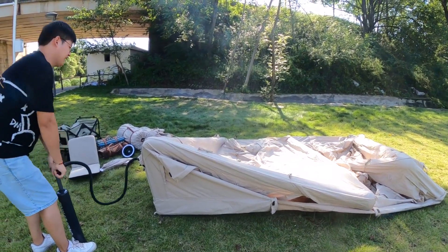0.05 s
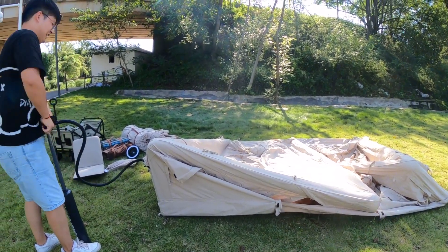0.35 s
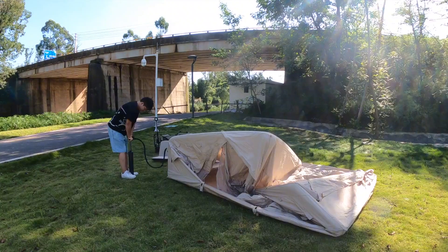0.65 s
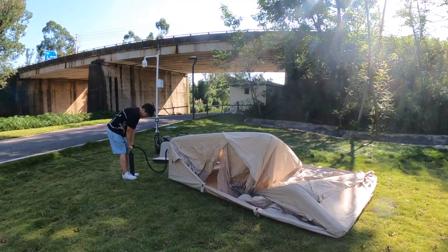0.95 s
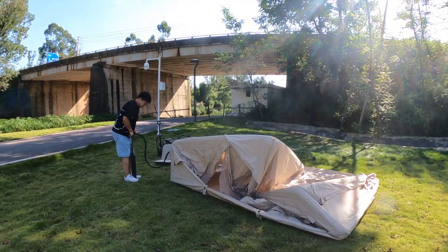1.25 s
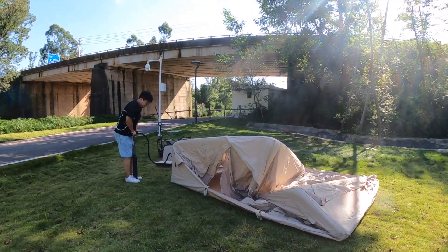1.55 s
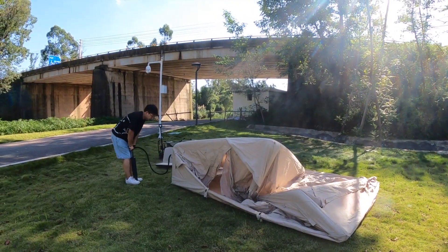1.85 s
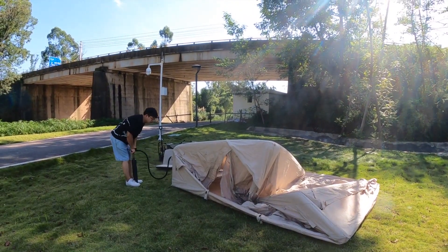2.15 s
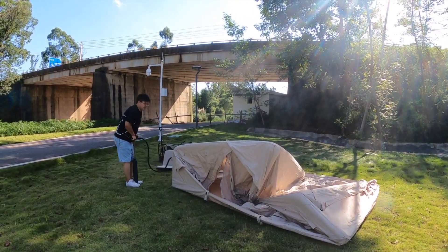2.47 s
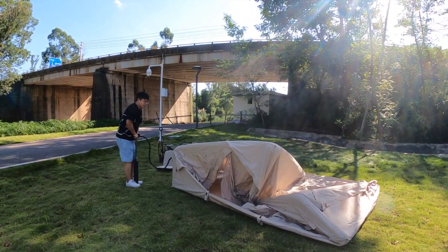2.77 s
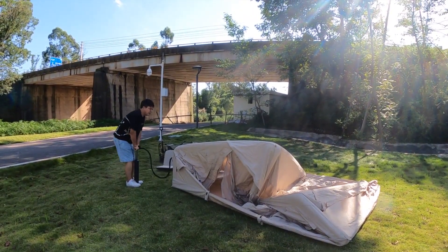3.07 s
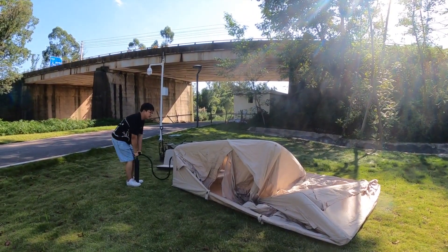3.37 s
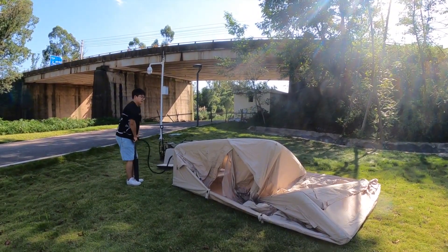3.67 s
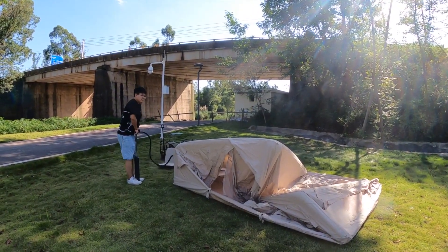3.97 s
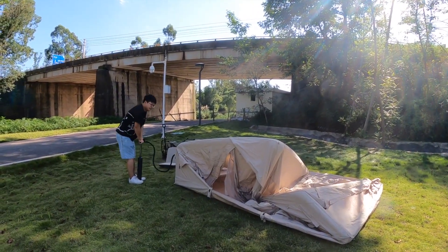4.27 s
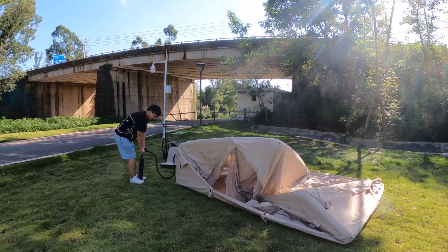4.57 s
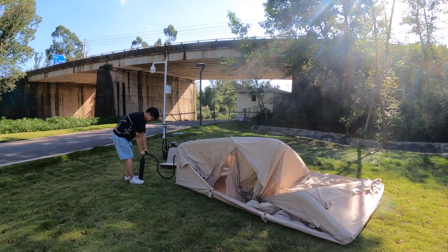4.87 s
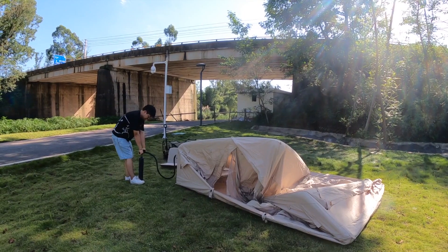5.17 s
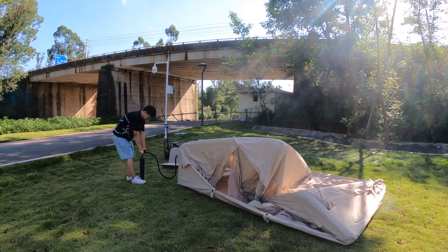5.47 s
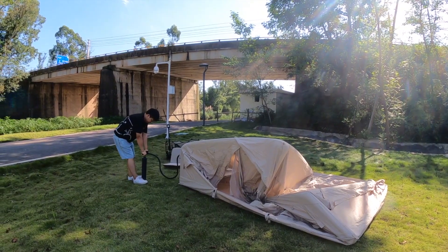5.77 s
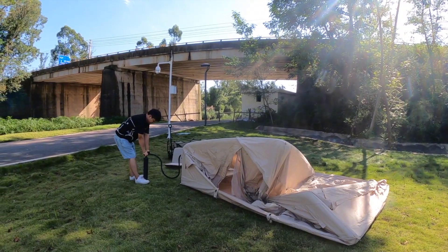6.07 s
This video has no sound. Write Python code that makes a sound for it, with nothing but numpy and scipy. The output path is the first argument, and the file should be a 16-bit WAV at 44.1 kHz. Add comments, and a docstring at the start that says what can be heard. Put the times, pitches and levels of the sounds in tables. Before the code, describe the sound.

A hand air pump inflates a tent outdoors. It begins close and slightly left, with a short rush of air, then a hollow valve thump and a loud, bright hiss at 0.2 seconds. Everything cuts to silence at about 0.7 seconds and fades back in at 0.9, with the pump now farther off and centred. Strokes follow roughly every 0.6 seconds, each a breathy hiss with a gently sweeping tone. Firmer thumps fall at about 1.2, 2.3 and 3.6 seconds, with softer ones between them. The last stroke starts at 4.2 seconds and dies away by 5. Underneath runs a low rumble of engines and tyres from a road bridge, with a faint, steady sizzle of insects. The engine drone swells from about 4 seconds. A distant bird chirps faintly between 4.9 and 6 seconds, and a tiny puff of air escapes the pump near 5.9.

```python
"""A double-action hand pump fills a tent: its valve thumps at each turn of the handle and air hisses through.
The hiss also bounces off the lawn, so its colour sweeps as the handle rises and sinks.
Behind it sits a bed of engine drone and tyre wash from a road bridge, sizzling insects and a far bird.
The pump starts close on the left; after a brief drop to silence it plays on from farther off."""
import sys
import numpy as np
from scipy import signal
from scipy.fft import rfft, irfft, next_fast_len
from scipy.io import wavfile
from scipy.ndimage import uniform_filter1d, map_coordinates

SR = 44100
rng = np.random.default_rng(int(sys.argv[2]) if len(sys.argv) > 2 else 0)


def output_pcm(signal):
    """Save a mono or channel-first signal as 16-bit PCM at the path in sys.argv[1].

    Samples are clipped to [-1, 1] before scaling.
    """
    pcm = np.clip(np.atleast_2d(signal).T, -1, 1) * 32767
    wavfile.write(sys.argv[1], SR, np.round(pcm).astype(np.int16))


N = 278897
T = np.arange(N) / SR

# calls of the far bird: start_s, level_db
CHIRPS = [(4.88, -65), (5.1, -66.5), (5.26, -62.5), (5.42, -66.5), (5.61, -71), (5.78, -70)]
# tone colours of the road bed: frequency_hz, relative_db
RUMBLE_SPECTRUM = [(10, 0), (28, 5), (55, 9.5), (80, 1.5), (105, 1), (160, -0.5), (220, -10.5), (300, -4),
                   (450, -8.5), (700, -18), (2000, -82)]
TYRE_SPECTRUM = [(150, -40.5), (400, -3), (560, 1), (720, 3), (1020, 9.5), (1500, 3.5), (2100, -3.5),
                 (3000, -12.5), (4500, -14.5), (6000, -18), (8000, -24), (10000, -33.5), (15000, -57)]
TYRE_SIDE_SPECTRUM = [(100, -31), (180, -10), (300, 4.5), (550, 6.5), (780, 6), (1100, 4.5), (1600, 0.5),
                      (2200, -0.5), (3000, -2), (4300, -9.5), (6000, -11.5), (8000, -11.5), (12000, -26.5),
                      (15000, -46)]  # the part that differs between the ears
# fader ride of the tyre wash: time_s, level_db
TYRE_LEVELS = [(0.67, -36), (0.9, -47), (1.7, -50), (3.6, -53.5), (4.2, -51.5), (4.9, -50.5), (5.4, -51),
               (6.32, -48)]
# engines before and after the silence: time_s, firing_hz, first_harmonic_db, second_harmonic_db
NEAR_ENGINE = [(0, 81.9, -35, -30.5), (0.17, 83.9, -39, -34), (0.28, 82.8, -36.5, -47)]
FAR_ENGINE = [(0.9, 74.1, -54.5, -58.5), (1.8, 71.96, -52.5, -67), (2.1, 71.59, -39.5, -56),
              (2.3, 70.5, -53.5, -52), (3.9, 70.81, -46, -60.5), (4.65, 71.34, -40, -43.5),
              (5.1, 70.03, -37.5, -43.5), (5.45, 71.05, -34.5, -43), (5.85, 71.35, -39, -47),
              (6.32, 67.3, -48, -71)]
# upper harmonics of the exhaust: harmonic_number, relative_db
EXHAUST_HARMONICS = [(3, -7.5), (4, -10.5), (5, -15), (6, -21.5), (8, -25)]
# drone under the bridge: time_s, boom_db, growl_db
BRIDGE_DRONE = [(0, -54, -60.5), (3.4, -54.5, -54.5), (3.9, -46, -53.5), (4.5, -49.5, -46),
                (5.1, -43, -57.5), (5.8, -44.5, -47.5), (6.32, -42.5, -48)]
# EQ of the pump's scattered sound, close by and farther off: frequency_hz, relative_db
NEAR_SCATTER_EQ = [(50, -46.5), (120, -30), (250, -35), (600, -34.5), (1200, -45.5), (1800, -44.5),
                   (2600, -45.5), (3400, -46.5), (5000, -45.5), (7500, -36.5), (12000, -5), (15000, -23)]
FAR_SCATTER_EQ = [(200, -45), (1000, -34), (3000, -33.5), (12000, -15)]
# turning points of the handle: time_s, height_fraction (0 bottom, 1 top)
HANDLE_TURNS = [(0, 0.1), (0.16, 0), (0.54, 1), (1.11, 0), (1.63, 1), (2.2, 0), (2.85, 1), (3.47, 0.08),
                (4.15, 1), (4.76, 0.07)]
# the rod shifting in its guide: start_s, level_db
SCUFFS = [(0.183, -36.5), (1.159, -45), (1.715, -47), (2.307, -46), (4.16, -53)]
# flips of the valve flap: start_s, thump_db, pitch_ratio, tick_lift_db
VALVE_FLIPS = [(0.2138, -21.5, 1.64, 3), (1.181, -19.5, 1.03, -0.5), (1.738, -36, 1.0, 5),
               (2.3474, -26, 0.975, 7.5), (2.94, -36.5, 0.89, 2), (3.6112, -24, 1.03, -8),
               (4.243, -36, 0.96, 3)]
# barrel modes, before each flip retunes them: pitch_hz, relative_db, swell_s
BARREL_MODES = [(251, 3, 0.0027), (770, -5.5, 0.0036), (970, -6, 0.0017), (3850, -14, 0.0055)]
# air resonances of the hollow shaft: centre_hz, width_hz, peak_db
SHAFT_RESONANCES = [(1550, 45, -2.5), (2645, 38, 2.5), (2845, 19, -12), (3040, 23, -19), (3400, 40, -3.5),
                    (3600, 80, 0.5), (3784, 49, -1), (4264, 120, -7), (5300, 58, -12), (5560, 100, -6),
                    (5880, 53, -11.5), (6080, 35, -2.5), (6840, 110, -10)]
# colours of the rushing air, from hollow to thin: frequency_hz, relative_db
CHUFF_SPECTRUM = [(100, -33.5), (300, -6.5), (600, -3.5), (900, 2.5), (1300, 2.5), (1750, 1), (2100, 1),
                  (2500, -3), (3500, -29.5), (8000, -64)]
HISS_SPECTRUM = [(900, -47), (1900, -3), (2350, 0.5), (2650, 0), (3000, 2), (3500, -2.5), (3900, -4),
                 (4400, -8.5), (5200, -16.5), (9000, -54)]
FIZZ_SPECTRUM = [(2500, -29.5), (4100, -6), (4600, 1), (5100, -0.5), (5900, 1), (6900, -3.5), (7700, -10),
                 (9000, -15.5), (10300, -22.5), (11300, -29), (12500, -27.5), (15000, -52.5)]
SLIT_SPECTRUM = [(4000, -42.5), (6500, 2), (7500, 2), (8400, 9), (10200, 8), (11300, 0.5), (12500, 4),
                 (15000, -19.5)]
# piston strokes, rising to the hardest push and falling to the stop:
# start_s, rise_s, fall_s, sag_db_per_s, hiss_db, chuff_db, fizz_db, slit_vs_fizz_db, hum_vs_hiss_db
UPSTROKES = [ (0.214, 0.14, 0.29, 55, -25.5, -38.5, -28.5, -15, -39.5),
             (1.183, 0.155, 0.34, 51.5, -32.5, -43.5, -44, -21, -11.5),
             (2.347, 0.1, 0.435, 24.5, -39, -46.5, -50, -12, -23),
             (3.613, 0.21, 0.32, 41.5, -36, -44, -46, -14.5, -22)]
DOWNSTROKES = [ (-0.02, 0.05, 0.12, 60.6, -28.5, -34.5, -31, -13, -26),
               (0.8, 0.14, 0.19, 48, -32.5, -44, -45, -39, -29),
               (1.738, 0.27, 0.24, 47.4, -39, -47.5, -48.5, -17.5, -13),
               (2.94, 0.41, 0.21, 52, -38, -48, -46.5, -16.5, -17.5),
               (4.243, 0.21, 0.48, 18, -41.5, -47, -46.5, -14.5, -24)]
# stereo width of the mix: time_s, side_gain_db
STEREO_WIDTH = [(0.68, -2.8), (0.88, -28), (3.1, -23), (3.7, -4)]

CUT_S, RESUME_S = 0.672, 0.897  # the silence between the close and the far perspective
CLOSE = T < CUT_S


def amp(db):
    """Decibels to gain."""
    return 10 ** (np.asarray(db) / 20)


def unit(x):
    """Scale to rms 1."""
    return x / np.sqrt(np.mean(x ** 2) + 1e-20)


def curves(rows):
    """One automation curve for each column after the time."""
    times, *columns = np.transpose(rows)
    return [np.interp(T, times, column) for column in columns]


def wobble(rate_hz):
    """A smooth random drift through rate_hz points a second."""
    coarse = T[::32]
    knots = rng.standard_normal(int(N * rate_hz / SR) + 4)
    return np.interp(T, coarse, map_coordinates(knots, [coarse * rate_hz]))


def filtered(x, response):
    """Filter x by a gain that is a function of frequency."""
    size = next_fast_len(N + 8192)
    return irfft(rfft(x, size) * response(np.fft.rfftfreq(size, 1 / SR)), size)[..., :N]


def equalised(x, points):
    """Shape x with an EQ curve through (frequency_hz, gain_db) points."""
    points_hz, db = np.transpose(points)
    return filtered(x, lambda hz: amp(np.interp(np.log(hz + 1), np.log(points_hz), db)))


def rush(spectrum):
    """Coloured noise of rms 1."""
    return unit(equalised(rng.standard_normal(N), spectrum))


def band(centre_hz, width_hz):
    """A band of noise of rms 1."""
    return unit(filtered(rng.standard_normal(N), lambda hz: 1 / (1 + ((hz - centre_hz) / width_hz) ** 4)))


def whistle(centre_hz, width_hz):
    """A breathy tone of rms 1 that follows a pitch curve."""
    a, b = filtered(rng.standard_normal((2, N)), lambda hz: 1 / (1 + (hz / width_hz) ** 2))
    phase = 2 * np.pi * np.cumsum(centre_hz) / SR
    return unit(a * np.cos(phase) + b * np.sin(phase))


def spread(mid, side):
    """Mid and side to left and right."""
    return np.array([mid + side, mid - side])


def background_hiss(level_db=-95):
    """A very faint, steady high background hiss."""
    return amp(level_db) * spread(band(12300, 500), band(12300, 500))


def insects(level_db=-69.5, side_db=-8):
    """Insects sizzle steadily near 7 kHz."""
    return amp(level_db) * spread(band(6850, 390), amp(side_db) * band(6930, 330))


def bird(chirp_s=0.17, first_hz=4080, sweep_hz=196, step_hz=62, side_db=-6):
    """A far bird gives blurred, rising chirps, each a step higher than the last."""
    level, pitch_hz = np.zeros(N), np.full(N, first_hz, float)
    for k, (start, db) in enumerate(CHIRPS):
        progress = np.clip((T - start) / chirp_s, 0, 1)
        level += amp(db) * np.sqrt(4 * progress * (1 - progress))
        pitch_hz = np.where(T >= start, first_hz + step_hz * k + sweep_hz * progress, pitch_hz)
    return level * spread(whistle(pitch_hz, width_hz=290), amp(side_db) * whistle(pitch_hz, width_hz=190))


def engine(rows, upper_db, waver_hz=0.5, waver_db=2.5):
    """A distant exhaust drones on unsteady harmonics of the firing rate."""
    firing_hz, first_db, second_db = curves(rows)
    phase = 2 * np.pi * np.cumsum(firing_hz + waver_hz * wobble(12)) / SR
    harmonics = [(1, first_db), (2, second_db)] + [(k, upper_db + db) for k, db in EXHAUST_HARMONICS]
    drone = np.zeros(N)
    for k, db in harmonics:
        drone += amp(db + waver_db * wobble(10)) * np.sin(k * phase + rng.uniform(0, 2 * np.pi))
    return np.sqrt(2) * drone


def bridge_drone():
    """A low boom and a growl above it hang under the bridge."""
    boom_db, growl_db = curves(BRIDGE_DRONE)
    growl = amp(growl_db) * unit(band(357, 55) + amp(-4) * band(539.7, 66))
    return amp(boom_db) * band(207.8, 39) + growl


def road_rumble(near_db=-33.5, far_db=-45, side_db=-38):
    """The low end of the road heaves gently, almost mono."""
    level = amp(np.where(CLOSE, near_db, far_db) + 2.3 * wobble(7.8))
    return level * spread(rush(RUMBLE_SPECTRUM), amp(side_db) * rush(RUMBLE_SPECTRUM))


def tyres(near_side_db=-5, far_side_db=-12):
    """Tyres on the road make a wide, slowly drifting wash."""
    level_db, = curves(TYRE_LEVELS)
    width = amp(np.where(CLOSE, near_side_db, far_side_db))
    return amp(level_db + 1.1 * wobble(3.7)) * spread(rush(TYRE_SPECTRUM), width * rush(TYRE_SIDE_SPECTRUM))


def road():
    """The traffic bed: engines, drone and rumble in the centre, tyres spread wider."""
    engines = np.where(CLOSE, engine(NEAR_ENGINE, upper_db=-35.5), engine(FAR_ENGINE, upper_db=-54))
    return engines + bridge_drone() + road_rumble() + tyres()


def bridge_echo(x, t60_s=0.97, build_s=0.26):
    """The concrete of the bridge gives back a late wash."""
    t = np.arange(SR // 2) / SR
    tail = rng.standard_normal(len(t)) * amp(-60 * t / t60_s) * np.clip(t / build_s, 0, 1)
    return signal.fftconvolve(x, tail / np.linalg.norm(tail))[:N]


def scattered(x, eq, t60_s=0.12):
    """Tent, hedge and bridge scatter the sound into a short, bright tail."""
    t = np.arange(SR // 5) / SR
    tail = rng.standard_normal(len(t)) * amp(-60 * t / t60_s)
    wet = signal.fftconvolve(x, tail / np.linalg.norm(tail))[:N]
    return equalised(wet, eq)


def handle_motion(turn_s=0.11):
    """Even travel with rounded turns: the height (0 to 1), and a gate that is 1 on the way up."""
    travel, = curves(HANDLE_TURNS)
    rising = uniform_filter1d((np.gradient(travel) > 0) * 1., SR // 20)
    return uniform_filter1d(travel, int(turn_s * SR)), rising


def ground_bounce(x, near_db=-3, low_cut_hz=1300, grass_hz=7500, up_share=0.7, down_share=0.52):
    """The lawn adds a delayed, duller copy: a comb filter that slides with the handle's height."""
    height, rising = handle_motion()
    near_lag_ms = np.interp(height, [0, 1], [1.97, 3.17])
    far_lag_ms = np.interp(height, [0, 1], [0.93, 1.68])
    lag_s = np.where(CLOSE, near_lag_ms, far_lag_ms) / 1000
    share = np.interp(rising, [0, 1], [down_share, up_share]) * amp(np.where(CLOSE, near_db, 0))
    bounce = filtered(x, lambda hz: hz / np.hypot(hz, low_cut_hz) / (1 + (hz / grass_hz) ** 4))
    delayed = map_coordinates(bounce, [(T - lag_s) * SR])
    return (x + share * delayed) / np.sqrt(1 + share ** 2 / 2)


def rod_scuffs(rise_s=0.0051):
    """The rod shifts in its guide as the handle turns: short, dull rubs."""
    level = np.zeros(N)
    for start, db in SCUFFS:
        swell = np.clip(T - start, 0, None) / rise_s
        level += amp(db) * swell * np.exp(1 - swell)
    return level * band(1100, 600)


def leak(start_s=5.925, level_db=-59, fade_db_per_s=75, attack_s=0.012):
    """A soft puff escapes from the resting pump."""
    age = np.clip(T - start_s, 0, None)
    envelope = np.clip(age / attack_s, 0, 1) * amp(level_db - fade_db_per_s * age)
    return envelope * unit(rush(HISS_SPECTRUM) + rush(FIZZ_SPECTRUM))


def valve_thumps():
    """Each flip of the flap puffs into the barrel, whose modes swell and die fast; the top one ticks."""
    thumps, t = np.zeros(N), np.arange(SR // 10) / SR
    for start, thump_db, ratio, tick_db in VALVE_FLIPS:
        for mode in BARREL_MODES:
            hz, mode_db, swell_s = mode
            swell = t * ratio / swell_s
            envelope = (swell * np.exp(1 - swell)) ** 2
            gain = amp(thump_db + mode_db + (tick_db if mode is BARREL_MODES[-1] else 0))
            thumps[round(start * SR):][:len(t)] += gain * envelope * np.sin(2 * np.pi * hz * ratio * t)
    return thumps


def through_shaft(x):
    """The hollow shaft lifts narrow bands of whatever passes through it."""
    return filtered(x, lambda hz: 1 + sum(
        amp(db) / (1 + 2j * (hz - centre) / width) for centre, width, db in SHAFT_RESONANCES))


def eddies(x, frame=1024):
    """Turbulence at the flap favours narrow bands that come and go within a tenth of a second."""
    spectra = signal.stft(x, nperseg=frame)[2]
    flicker = uniform_filter1d(rng.standard_normal(spectra.shape), 3, axis=0)  # smooth across frequency
    flicker = unit(uniform_filter1d(flicker, 9, axis=1))  # and over time
    depth_db = np.interp(np.fft.rfftfreq(frame, 1 / SR), [1000, 4000], [1.5, 3])
    return signal.istft(spectra * amp(depth_db[:, None] * flicker), nperseg=frame)[1][:N]


def stroke(start, rise, fall, sag_db_per_s, swell_db_per_s=23, brake_s=0.11, brake_db=16):
    """Flap opening and push (dB): the flow builds as the arms lean in, sags, and the piston brakes."""
    peak, end = start + rise, start + rise + fall
    attack = np.clip((T - start) / 0.011, 0, 1)
    braking = np.clip((T - end + brake_s) / brake_s, 0, 1)
    release = np.exp(-np.clip(T - end, 0, None) / 0.05)
    opening = attack * amp(-brake_db * braking ** 2) * release
    push_db = np.minimum(swell_db_per_s * (T - peak), sag_db_per_s * (peak - T))
    return opening, push_db


def spit(age, level_db=9.5, attack_s=0.003, decay_s=0.005):
    """Trapped air spits out as the flap opens: a transient on the chuff's envelope."""
    return np.clip(age / attack_s, 0, 1) * amp(level_db) * np.exp(-age / decay_s)


def rushing_air(whistle_hz=2542, whistle_rise_hz=987, slit_fade_db_per_s=20, flutter_db=0.62):
    """Air rushes through the valve on each stroke, sharpest while the flap has only just opened."""
    hiss, chuff, fizz, slit, hum, flow = np.zeros((6, N))  # five layer envelopes and the air flow
    height, _ = handle_motion()
    # the chuff is top_lift_db louder with the handle at the top than at the bottom
    for strokes, top_lift_db in (UPSTROKES, 12), (DOWNSTROKES, 5.5):
        for start, rise, fall, sag, hiss_db, chuff_db, fizz_db, slit_db, hum_db in strokes:
            opening, push_db = stroke(start, rise, fall, sag)
            age = np.clip(T - start, 0, None)
            push = opening * amp(push_db)
            spray = opening * amp(fizz_db + 0.97 * push_db)  # fizz tracks the push, chuff barely does
            chuff += (opening + spit(age)) * amp(chuff_db + 0.038 * push_db + top_lift_db * (height - .5))
            flow += push
            hiss += push * amp(hiss_db)
            fizz += spray
            slit += spray * amp(slit_db - slit_fade_db_per_s * age)
            hum += push * amp(hiss_db + hum_db)  # the flow also stirs the barrel
    core = amp(-3.5) * rush(HISS_SPECTRUM)
    core += amp(-9.5) * whistle(whistle_hz + whistle_rise_hz * flow, width_hz=410)
    body = hiss * core + chuff * rush(CHUFF_SPECTRUM)
    top = amp(-1) * fizz * rush(FIZZ_SPECTRUM) + slit * rush(SLIT_SPECTRUM)
    jet = (body + top + hum * band(830, 110)) * amp(flutter_db * wobble(45))
    return through_shaft(eddies(jet + leak()))


def scene(near_pan_db=3, near_wet_db=2, echo_db=-25):
    """The pump over road, insects and bird; the whole mix cuts to silence and fades back in."""
    pump = ground_bounce(rushing_air() + rod_scuffs()) + valve_thumps()
    mid = pump + amp(echo_db) * bridge_echo(pump * ~CLOSE)
    near_side = amp(near_wet_db) * scattered(pump, NEAR_SCATTER_EQ)
    side = np.where(CLOSE, near_side, scattered(pump, FAR_SCATTER_EQ))
    pan_db = np.where(CLOSE, near_pan_db, 0)
    placed_pump = spread(mid, side) * amp([pan_db, -pan_db])
    fade_out = np.clip((CUT_S - T) / 0.002, 0, 1)
    fade_in = np.clip((T - RESUME_S) / 0.07, 0, 1) ** 1.4
    return (fade_out + fade_in) * (placed_pump + road() + insects() + background_hiss() + bird())


def record(dry, high_cut_hz=15000):
    """The image is nearly mono after the silence, then opens; a steep high cut trims the top."""
    left, right = dry
    side_db, = curves(STEREO_WIDTH)
    narrowed = spread((left + right) / 2, amp(side_db) * (left - right) / 2)
    return filtered(narrowed, lambda hz: hz < high_cut_hz)


dry = scene()
out = record(dry)
output_pcm(out)
```